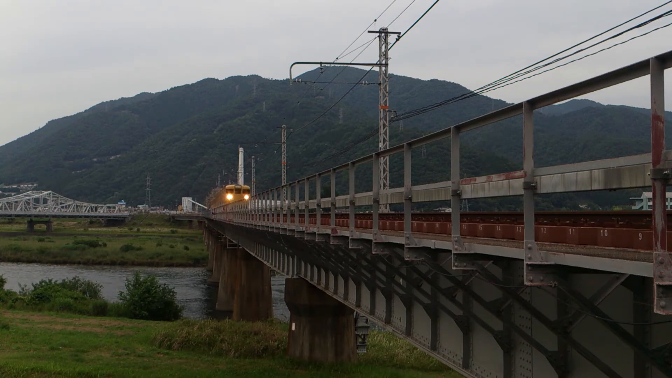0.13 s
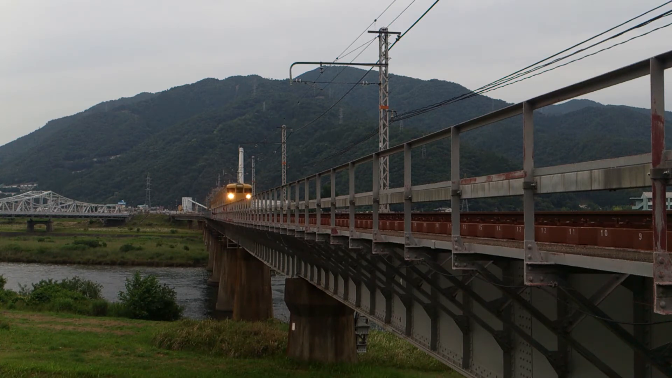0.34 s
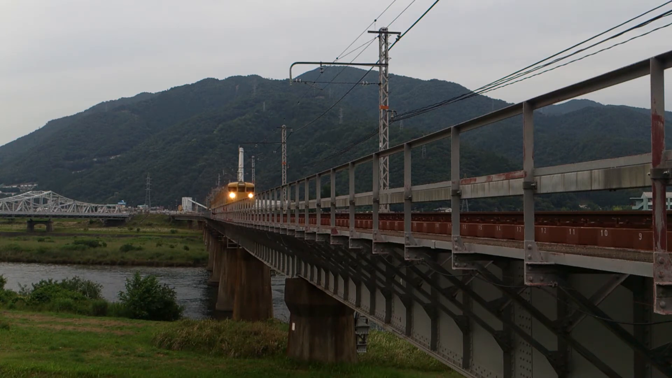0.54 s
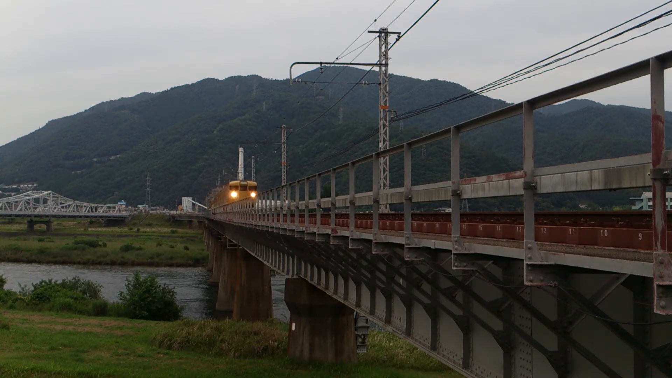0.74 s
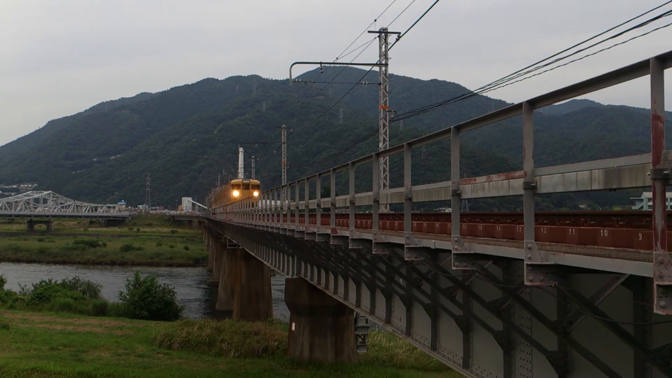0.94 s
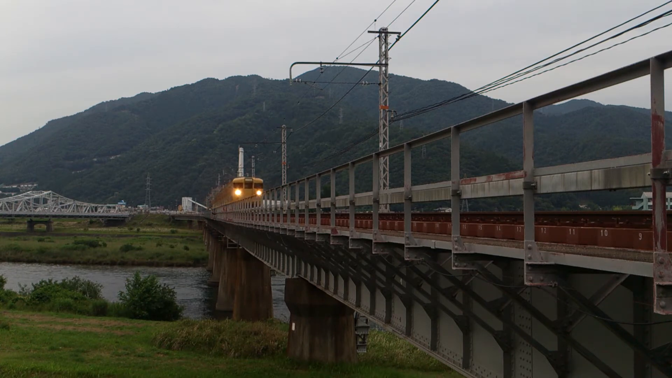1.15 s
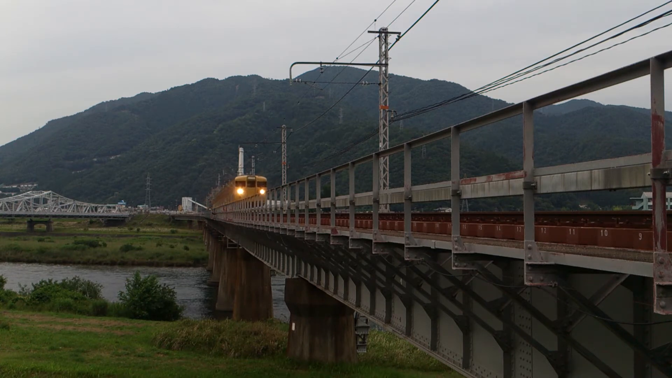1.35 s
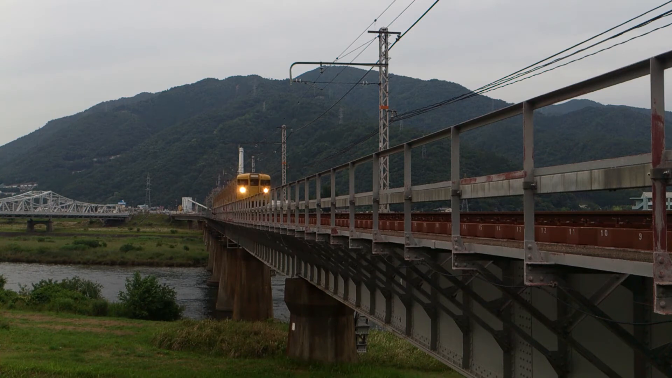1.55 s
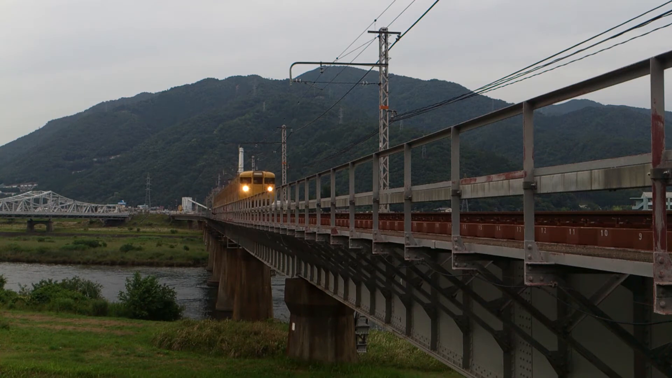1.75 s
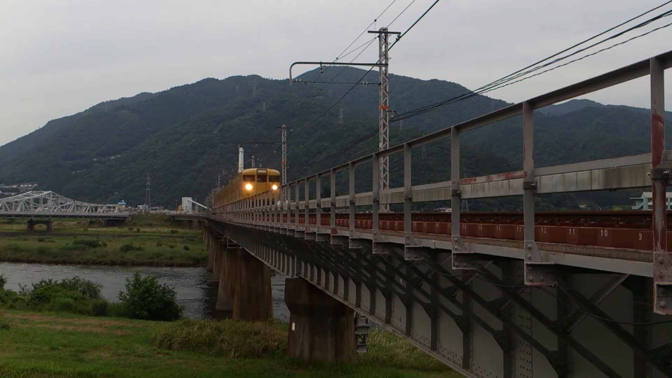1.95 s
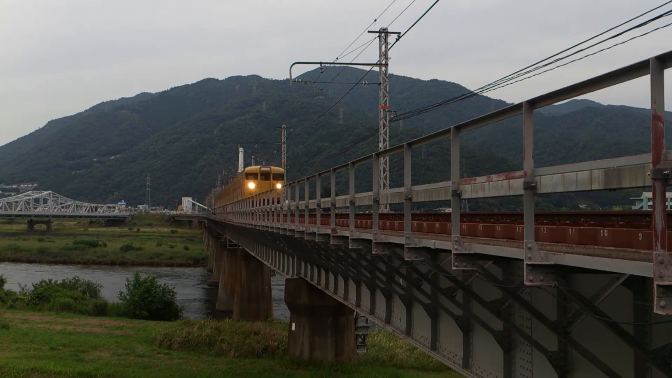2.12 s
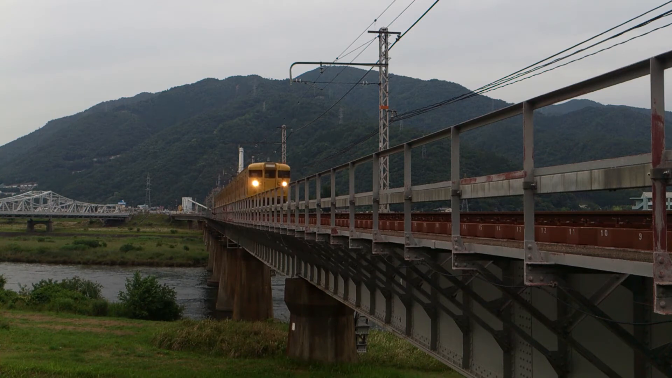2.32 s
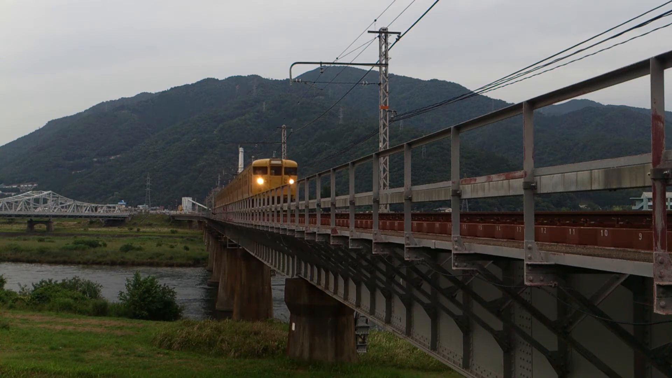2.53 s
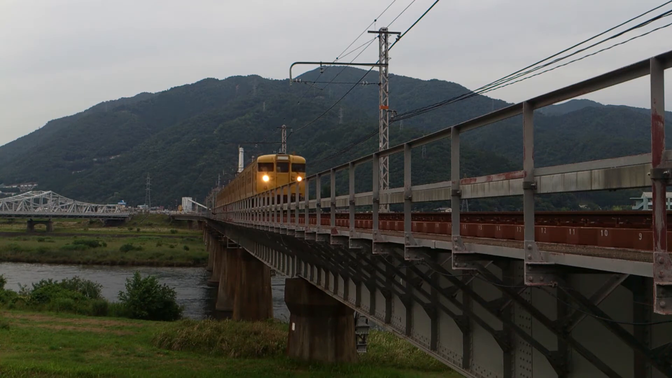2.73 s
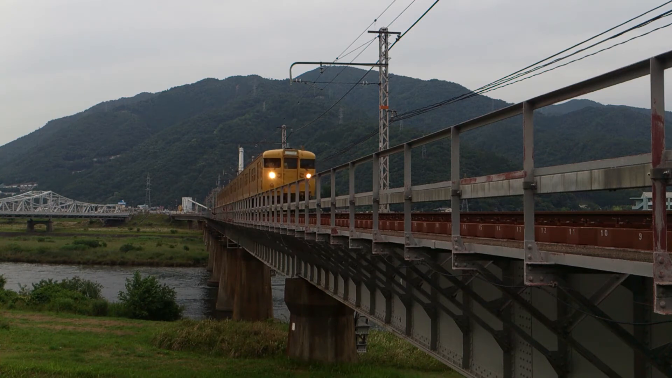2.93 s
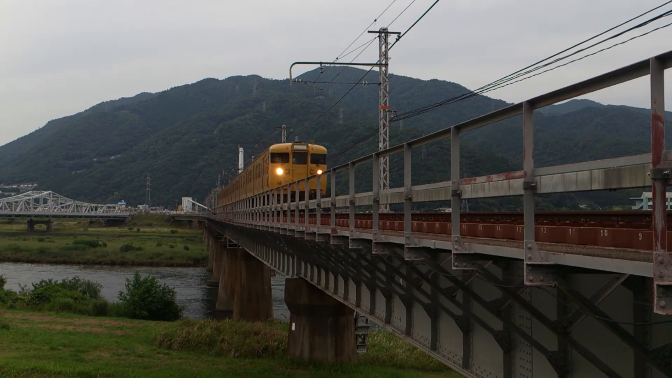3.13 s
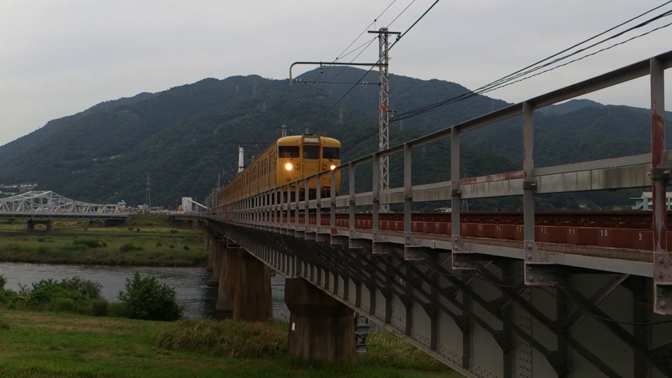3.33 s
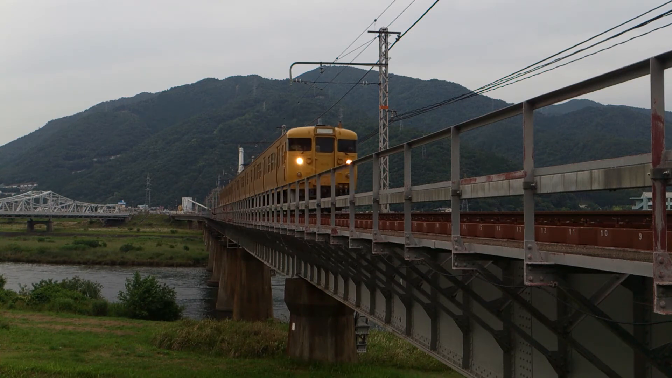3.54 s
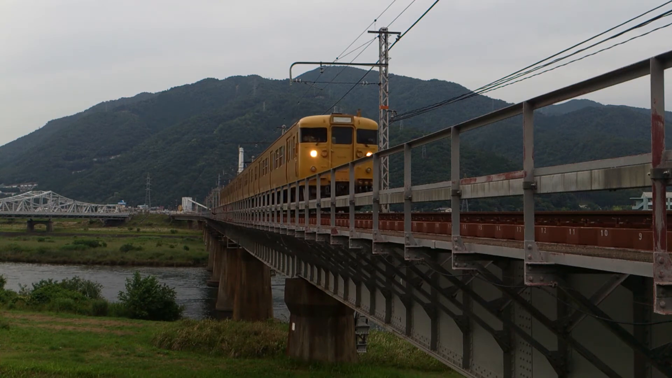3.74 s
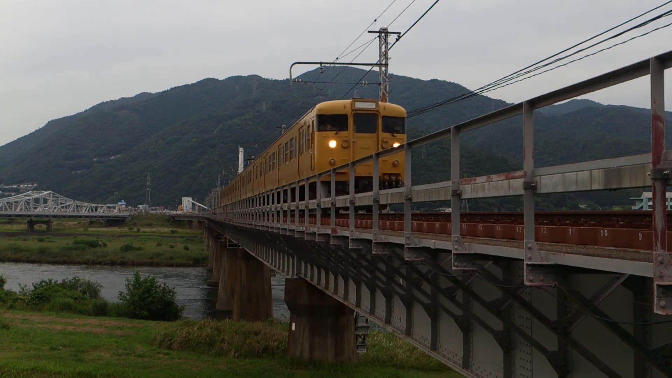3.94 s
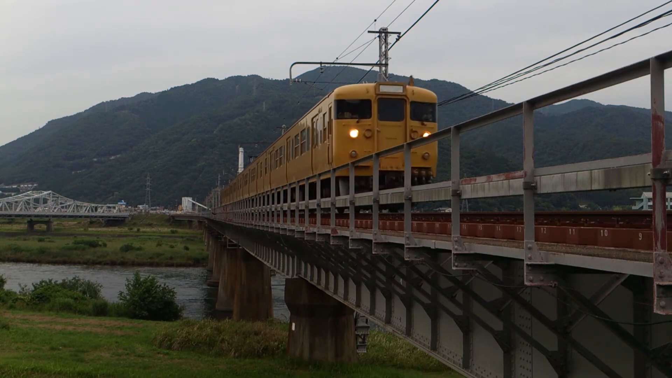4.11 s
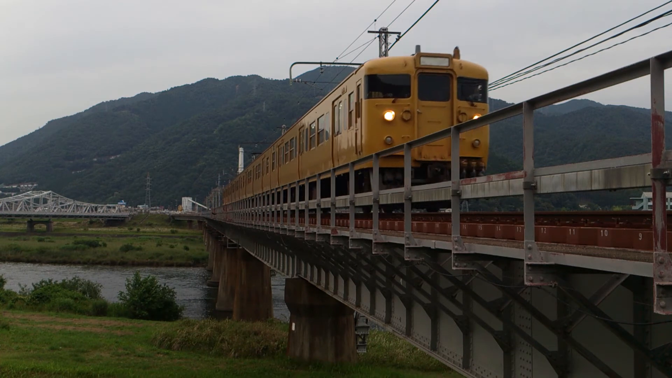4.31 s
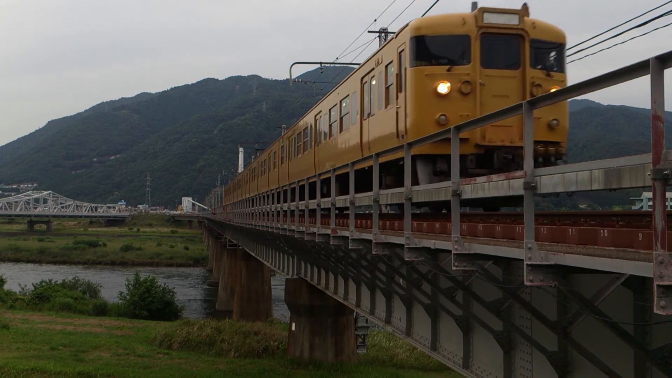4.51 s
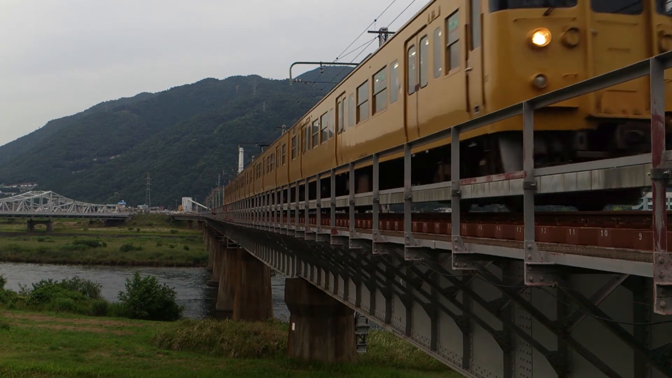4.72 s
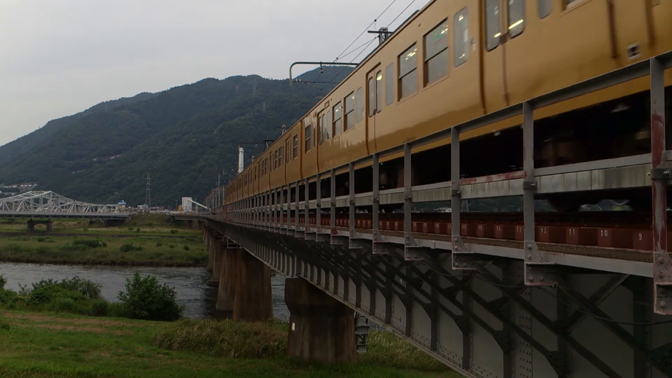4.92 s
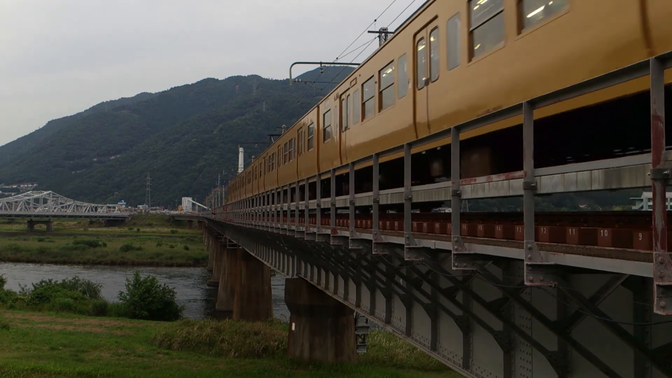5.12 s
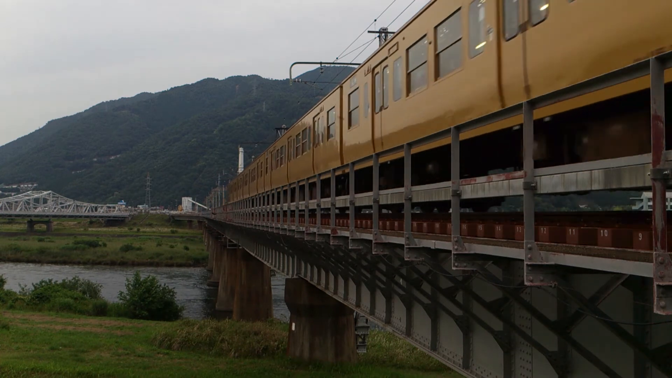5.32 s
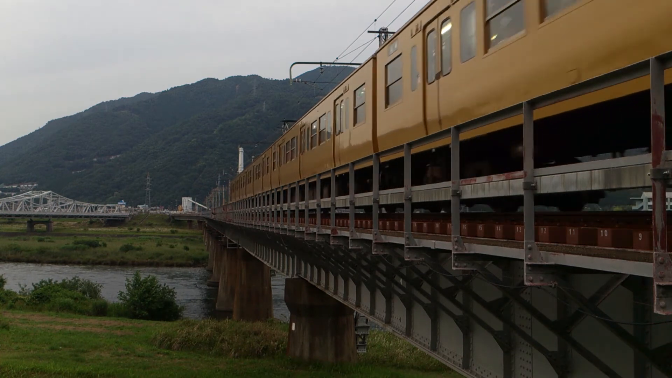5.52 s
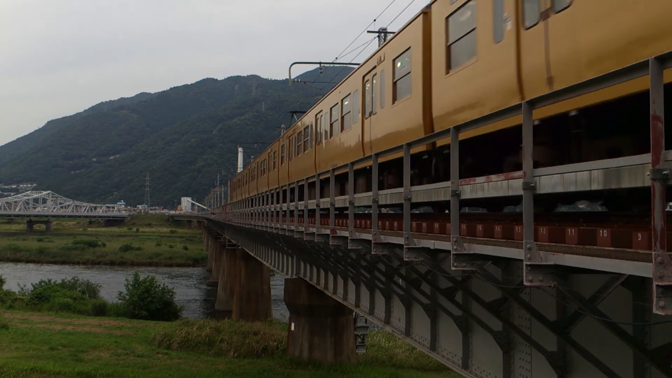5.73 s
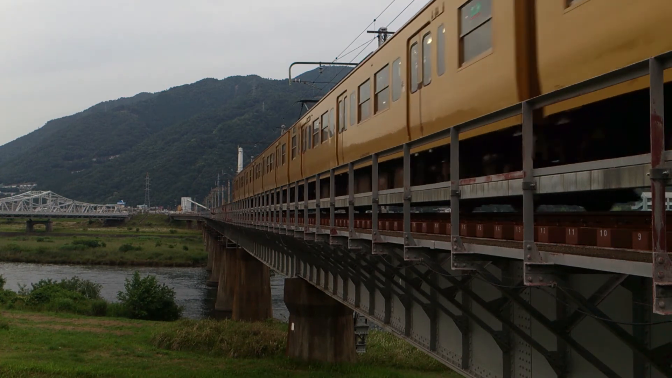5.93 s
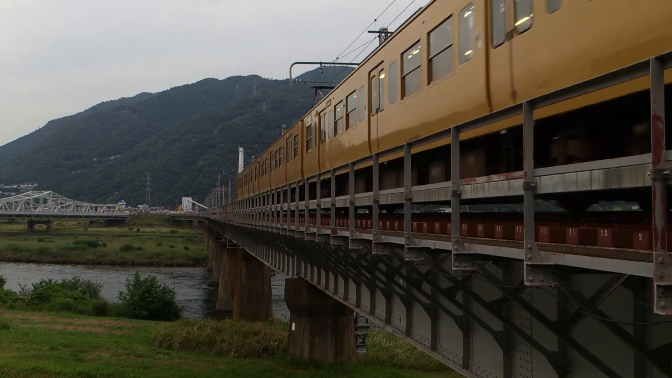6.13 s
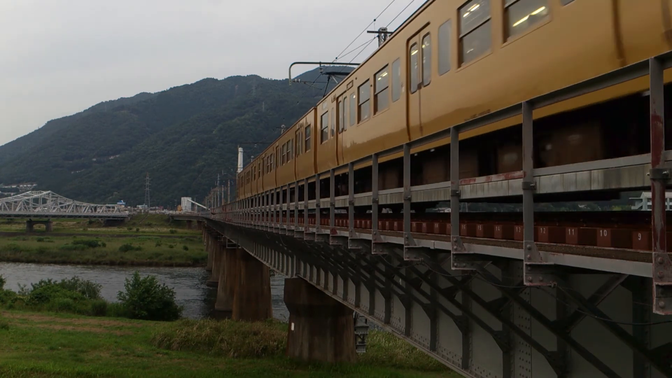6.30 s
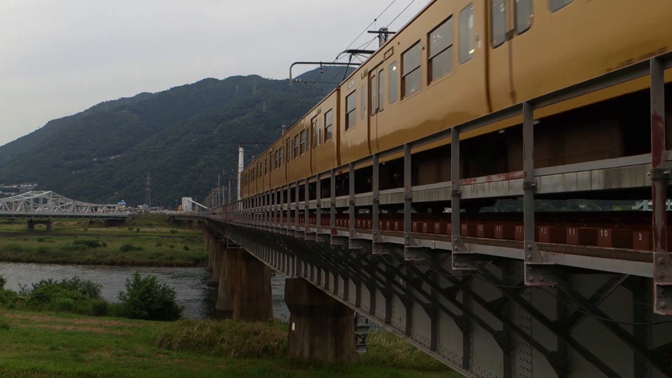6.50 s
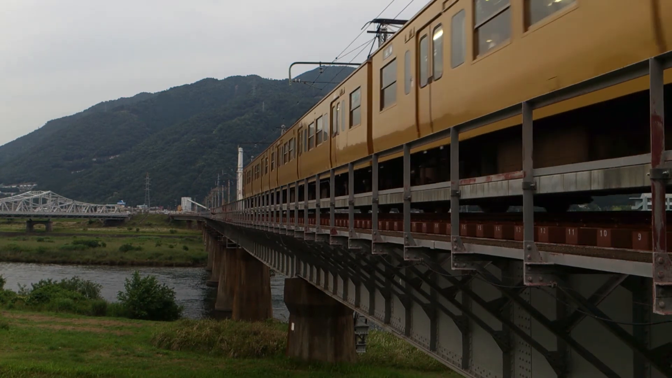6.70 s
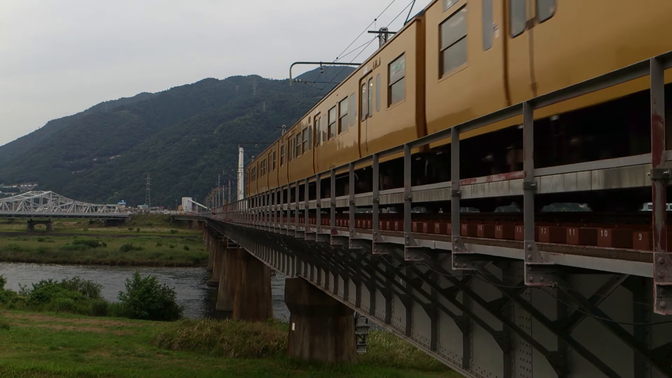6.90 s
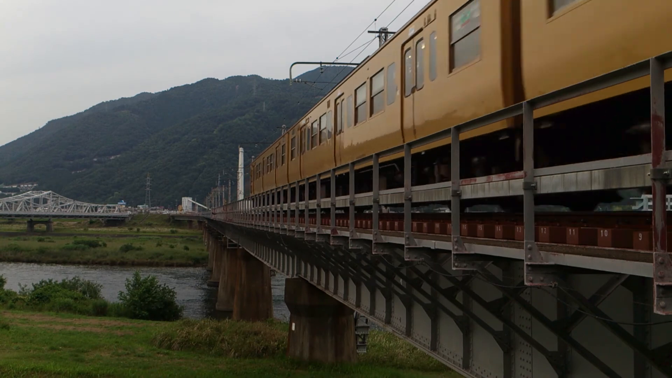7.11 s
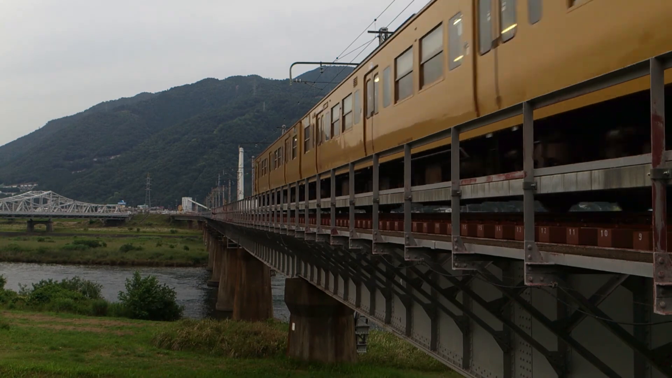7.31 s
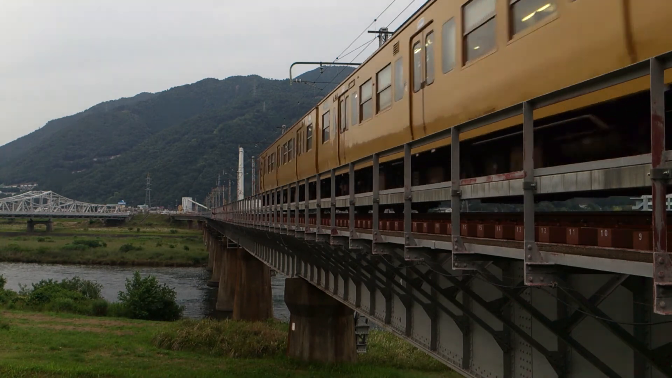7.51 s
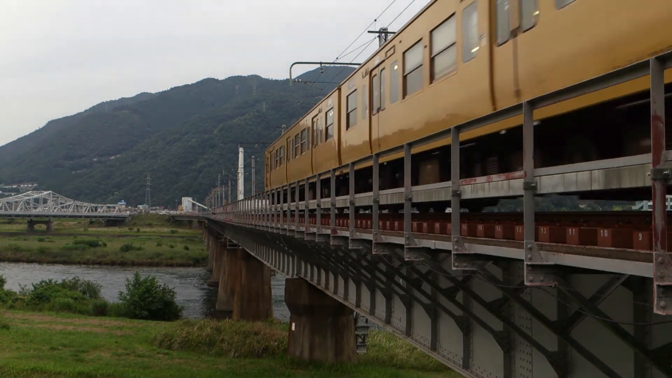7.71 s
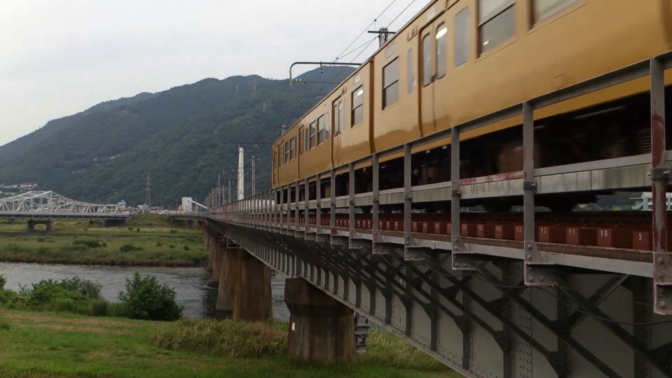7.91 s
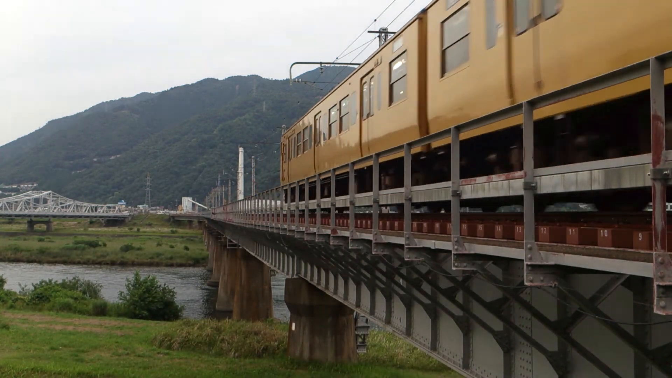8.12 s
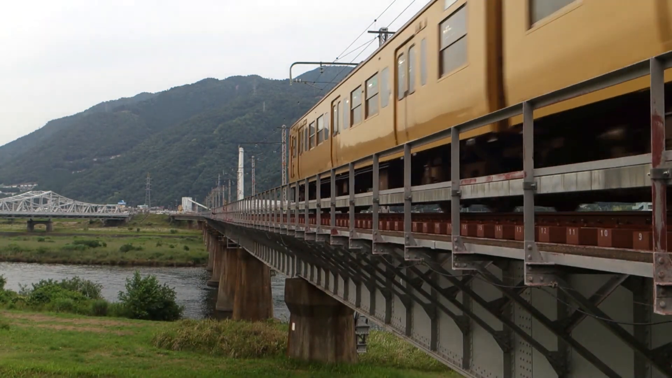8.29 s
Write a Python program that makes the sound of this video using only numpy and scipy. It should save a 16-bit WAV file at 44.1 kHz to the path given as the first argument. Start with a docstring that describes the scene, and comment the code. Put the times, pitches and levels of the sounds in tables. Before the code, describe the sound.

A camera shutter snaps five times as an electric train nears over a droning steel bridge, then roars past with rhythmic wheel clatter.

```python
"""A camera shutter snaps over the drone of a steel girder bridge and a faint river hiss.
An electric train rolls over the bridge and passes close by; the shutter fires five times as it nears.
Rough wheels ring the girders, treads roar and hiss on the rail, gears growl and flanges squeal.
Axle pairs strike three rail joints: one far out, one on the span (which booms), one close by."""
import sys
import numpy as np
from scipy import signal
from scipy.fft import rfft, irfft
from scipy.io import wavfile
from scipy.ndimage import uniform_filter1d

SR = 44100
rng = np.random.default_rng(int(sys.argv[2]) if len(sys.argv) > 2 else 0)


def output_pcm(signal):
    """Save a mono or channel-first signal as 16-bit PCM at the path in sys.argv[1].

    Samples are clipped to [-1, 1] before scaling.
    """
    pcm = np.clip(np.atleast_2d(signal).T, -1, 1) * 32767
    wavfile.write(sys.argv[1], SR, np.round(pcm).astype(np.int16))


N = 368235
TIME_S = np.arange(N) / SR

CARS, CAR_GAP_S, BOGIE_GAP_S, AXLE_GAP_S = 4, 1.203, 0.843, 0.123
SPEED_M_S, ARRIVAL_S = 16.9, 5.052  # leading wheels draw level with the listener

# Noise spectra. Each row: frequency in Hz, relative density in dB.
RIVER_SPECTRUM = [(1290, -35), (2200, -13), (2450, -4.5), (2710, -7.5), (3650, -9.5), (4380, -8.5),
                  (5220, -13), (5570, -15), (5910, -14), (6860, -9), (7840, -4), (8730, -12), (9640, -20),
                  (16000, -23.5)]
SHUTTER_SPECTRUM = [(1200, -23), (3000, -14), (4800, -11), (6200, -9), (7300, 0), (8400, 3), (9600, -15.5),
                    (12500, -18), (16000, -21)]
DECK_SPECTRUM = [(20, -33), (32, -26), (47, -5), (56, -11), (70, 1), (82, -3), (98, 1.5), (112, -2),
                 (135, -4.5), (170, -43)]
ROAR_SPECTRUM = [(420, -33), (720, -3), (950, -3), (1300, -3.5), (1650, -7), (2100, -8), (2500, -11.5),
                 (3100, -20), (4000, -27)]
HISS_SPECTRUM = [(1650, 3), (2800, -6.5), (3060, -8), (4150, 1), (5480, -8.5), (5980, 0), (6480, -4.5),
                 (7280, 1.5), (7830, 1.5), (9330, -11), (10500, -13), (12000, -20), (13200, -20),
                 (15100, -21), (16000, -28)]
CLANK_SPECTRUM = [(120, -42), (250, 7), (450, 15.5), (800, 7), (1200, 3.5), (2000, -6), (3000, -10),
                  (4200, -12), (6000, -18), (7800, -9.5), (10000, -34), (16000, -38)]
TICK_SPECTRUM = [(4000, -15), (7600, 9), (9000, 1), (11500, -5.5), (13200, -14), (16000, -7)]
CLASH_SPECTRUM = [(1500, 7.5), (2800, 0.5), (3400, -1.5), (4900, 3), (6200, -3.5), (7700, 6), (9200, -4.5),
                  (12000, -23), (16000, -30)]

# Resonances. Each row: frequency in Hz, width in Hz, relative level in dB.
MOTOR_MODES = [(122.2, 10, -0.5), (241, 6.7, 4)]
GEAR_WHEEL_MODES = [(543, 86, 1.5), (588.5, 52, -0.5), (635.6, 13.7, -2), (662.7, 35.3, .5),
                    (707, 48, -7.5), (756, 110, -8.5)]
WHEEL_RAIL_MODES = [(3286, 61, -1), (3596, 170, 2.5), (4080, 110, -1), (4580, 91, -7), (4970, 82, -3.5),
                    (5390, 100, -2), (7480, 150, -4), (7900, 250, 2), (10040, 120, -10), (12190, 110, -21),
                    (12990, 120, -18)]
RAIL_END_MODES = [(4490, 98, 1), (7950, 300, -7), (10300, 300, -3.5), (10840, 370, -1), (12950, 450, -4),
                  (13550, 700, -1)]
# Girder plates. Each row: frequency in Hz, width in Hz, weight in dB with the train far, then near.
GIRDER_MODES = [(124.6, 13.4, -6.5, -0.5), (158.2, 20.4, 3.5, 2), (182, 31, 2, 1), (204.1, 17.6, 3.5, -1.5),
                (247.3, 15.4, -1, 1.5), (284.7, 17.2, 4.5, -4), (295, 24.5, -7.5, -0.5),
                (328, 29, -1.5, -1), (350.8, 19, -10, -4), (367.5, 15.4, -7, -1), (402.5, 27.4, -6, -3),
                (442, 26, -15, -3), (474.5, 44, -12.5, -8.5)]
# Span under an axle. Each row: frequency in Hz, relative level in dB, decay in seconds.
BOOM_MODES = [(93, 0.5, 0.095), (86, -7, 0.042), (102.5, -7.5, 0.062), (71.1, -9, 0.16)]

# Insects on the bank. Each row: centre in seconds, pitch in Hz, level in dB.
INSECT_CHIRPS = [(2.18, 5800, -54), (2.472, 9000, -52), (2.565, 8350, -50), (2.665, 8300, -48)]
# Shutter cycles. Each row: mirror up, first curtain, second curtain, mirror down in seconds, gain in dB.
SHUTTER_CYCLES = [(.1015, .1162, .166, .2066, 0), (.348, .3625, .4152, .456, -1),
                  (.5972, .6115, .6645, .7052, 0), (.9954, 1.0098, 1.0571, 1.098, -1),
                  (3.997, 4.0125, 4.0611, 4.102, 0)]
# Flange contacts. Each row: centre in seconds, pitch in Hz, level in dB, half length in seconds.
FLANGE_SQUEALS = [(4.105, 1770, -25.5, 0.02), (4.094, 4620, -38, .012), (5.608, 8230, -27, 0.022),
                  (5.62, 4940, -35, 0.03), (5.77, 4900, -37, .03), (6.572, 4870, -35, 0.044),
                  (7.707, 8300, -25, 0.021), (7.76, 7840, -27, 0.037), (8.06, 7480, -23, .045)]
# Swells. Each row: centre in seconds, gain in dB, half length in seconds.
GIRDER_SWELLS = [(0.05, 4, 0.15), (0.62, 2.5, .12), (1.197, 3, 0.3), (2.287, 3.5, 0.15), (2.82, 4, 0.23),
                 (3.617, 2.5, 0.23), (4.172, 4, .24)]  # bogies roll onto the farther spans
GEAR_HOWLS = [(4.7, -17.5, 0.2), (5.55, -23, 0.11), (5.95, -17.5, .24), (7.16, -19.5, 0.21),
              (8.35, -19.5, 0.16)]
TREAD_SCRAPES = [(4.14, -30, 0.064), (4.25, -29, 0.049), (4.35, -29, .07), (5.19, -27, 0.036),
                 (5.3, -31, 0.022), (6.2, -29.5, 0.043)]
# Axles on a rail joint. Each row: start in seconds, base level in dB.
FAR_STRIKES = [(2.705, -29.5), (2.84, -30.5), (3.545, -33), (3.68, -31.5), (3.885, -33)]
NEAR_STRIKES = [(5.586, -23), (5.711, -18.5), (6.428, -18.5), (6.548, -21.5), (6.785, -16.5), (6.911, -16),
                (7.628, -18), (7.754, -18), (7.986, -14), (8.113, -15)]


def undb(db):
    return 10 ** (np.asarray(db) / 20)


def unit_rms(x):
    return x / np.sqrt(np.mean(x ** 2))


def noise():
    return rng.standard_normal(N)


def colour(x, spectrum):
    """Filter by a spectrum, falling 48 dB per octave beyond its ends; white noise keeps its power."""
    hz, db = np.transpose(spectrum)
    octave, knots = np.log2(np.fft.rfftfreq(len(x), 1 / SR) + 1), np.log2(hz)
    beyond = np.abs(octave - np.clip(octave, knots[0], knots[-1]))
    gain = unit_rms(undb(np.interp(octave, knots, db) - 48 * beyond))
    return irfft(rfft(x) * gain, len(x))


def wander(rate_hz):
    """Random steps, smoothed twice; unit RMS."""
    hold = int(SR / rate_hz)
    steps = np.repeat(noise()[:N // hold + 1], hold)
    return unit_rms(uniform_filter1d(uniform_filter1d(steps, hold), hold)[:N])


def grains(per_s, spread_db):
    """Dense tiny impacts of uneven size."""
    impacts = (rng.random(N) < per_s / SR) * noise()
    return unit_rms(impacts * undb(spread_db * np.minimum(rng.exponential(size=N), 4)))


def resonance(hz, width_hz, drive=None):
    """Two peak filters in series, driven by fresh noise by default."""
    drive = noise() if drive is None else drive
    b, a = signal.iirpeak(hz, hz / (1.55 * width_hz), SR)
    return unit_rms(signal.lfilter(b, a, signal.lfilter(b, a, drive)))


def ring(modes):
    """Resonances sharing one noise drive."""
    drive = noise()
    return unit_rms(sum(undb(db) * resonance(hz, width_hz, drive) for hz, width_hz, db in modes))


def strike_shape(t, rise_s, decay_s):
    """Smooth rise, exponential decay; peak 1."""
    shape = (1 - np.exp(-(t / rise_s) ** 2)) * np.exp(-t / decay_s)
    return shape / shape.max()


def blows(starts_s, levels_db, rise_s, decay_s):
    """Envelope of a run of blows, summed in power."""
    shape = strike_shape(np.arange(SR) / SR, rise_s, decay_s)
    power = np.zeros(N + SR)
    for start_s, db in zip(starts_s, levels_db):
        i = int(start_s * SR)
        power[i:i + SR] += (undb(db) * shape) ** 2
    return np.sqrt(power[:N])


def bell(centre_s, half_s):
    return np.exp(-((TIME_S - centre_s) / half_s) ** 2)


def swells(table):
    return sum(undb(db) * bell(centre_s, half_s) for centre_s, db, half_s in table)


def approach(reach_m, loss_db_per_m=0):
    """Distance gain, 1 from arrival on; spreading takes 3 dB at reach_m."""
    gap_m = SPEED_M_S * np.maximum(ARRIVAL_S - TIME_S, 0)
    return undb(-loss_db_per_m * gap_m) / np.hypot(1, gap_m / reach_m)


def axle_times(first_s):
    """Crossings of one spot: two axles to a bogie, two bogies to a car."""
    times_s = np.array([first_s + car * CAR_GAP_S + bogie_s + axle_s for car in range(CARS)
                        for bogie_s in (0, BOGIE_GAP_S) for axle_s in (0, AXLE_GAP_S)])
    return times_s[times_s < TIME_S[-1]]


def riverbank():
    """Far water hisses; insects chirp thinly."""
    chirps = sum(undb(db) * bell(centre_s, half_s=0.007) * resonance(hz, width_hz=350)
                 for centre_s, hz, db in INSECT_CHIRPS)
    return colour(noise(), RIVER_SPECTRUM) * undb(-52 + wander(5.3)) + chirps


def shutter():
    """Mirror and curtains snap; the first curtain bounces, the mirror pings twice, its spring settles."""
    up_s, first_s, second_s, down_s, db = np.transpose(SHUTTER_CYCLES)
    snaps = [(up_s, -31), (first_s - 0.003, -30), (first_s, -23.5), (first_s + 0.0113, -33),
             (second_s, -25.5), (down_s, -32)]
    strike = sum(blows(at_s, db + snap_db, rise_s=0.00048, decay_s=0.0016) for at_s, snap_db in snaps)
    body = blows(first_s, db - 39, rise_s=0.0012, decay_s=0.015)
    body += blows(second_s, db - 44, rise_s=0.0013, decay_s=0.016)
    spring = blows(down_s, db - 40.5, rise_s=0.001, decay_s=0.038)
    ping = blows(down_s, db - 27, rise_s=0.00051, decay_s=0.0014)
    ping += blows(down_s + 0.0062, db - 34, rise_s=0.001, decay_s=0.0026)
    return colour(noise() * (strike + body + spring), SHUTTER_SPECTRUM) + resonance(8500, 770) * ping


def chinks(per_s=9, low_hz=3590, high_hz=6260, decay_s=0.024):
    """Loose steel under the passing cars rings at random."""
    out, t = np.zeros(N + SR), np.arange(SR // 8) / SR
    passing_s = TIME_S[-1] - ARRIVAL_S
    for when, pitch, size in rng.random((int(per_s * passing_s), 3)):
        i = int((ARRIVAL_S + when * passing_s) * SR)
        hz = low_hz + pitch * (high_hz - low_hz)
        out[i:i + len(t)] += undb(-38.5 + 10 * size) * np.exp(-t / decay_s) * np.sin(2 * np.pi * hz * t)
    return out[:N]


def flanges():
    """Flanges brush the rail in short, narrow squeals."""
    return sum(undb(db) * bell(centre_s, half_s) * resonance(hz, width_hz=200)
               for centre_s, hz, db, half_s in FLANGE_SQUEALS)


def running_gear(rail_borne_db=-46.5):
    """Gears growl, carried far ahead by the rails, and howl at each car end; the motor cars hum."""
    airborne = undb(-23) * approach(reach_m=13.8, loss_db_per_m=0.14)
    growl = ring(GEAR_WHEEL_MODES) * np.hypot(airborne, undb(rail_borne_db))
    howl = unit_rms(ring(GEAR_WHEEL_MODES) + undb(-6) * resonance(668, 60)) * swells(GEAR_HOWLS)
    hum = ring(MOTOR_MODES) * undb(-24.3) * bell(centre_s=7.24, half_s=1.3)
    return growl + howl + hum


def wheels(rail_borne_db=-47, hiss_rise_db_per_s=0.92):
    """Treads roar, hiss and scrape on the rail, shuddering together; the hiss carries least far."""
    shudder, scrape = wander(28), swells(TREAD_SCRAPES)
    # The rail flexes between sleepers and sings ahead of the train.
    singing = resonance(1210, 310) * undb(np.interp(TIME_S, [3.5, 5], [-9, -11]))
    roar = colour(grains(per_s=9000, spread_db=-0.1), ROAR_SPECTRUM) + singing
    roar_gain = np.hypot(undb(-25) * approach(reach_m=7.4, loss_db_per_m=0.14), undb(rail_borne_db))
    roar *= np.hypot(roar_gain, undb(4) * scrape) * undb(0.6 * shudder)
    hiss = colour(grains(per_s=14000, spread_db=-1), HISS_SPECTRUM)
    hiss += undb(-9 + 3.3 * wander(9)) * ring(WHEEL_RAIL_MODES)
    hiss_gain = undb(-28.5 + hiss_rise_db_per_s * (TIME_S - ARRIVAL_S))
    hiss_gain *= approach(reach_m=4.8, loss_db_per_m=0.22)
    hiss *= np.hypot(hiss_gain, scrape) * undb(1.2 * shudder + 0.92 * wander(60))
    return roar + hiss


def bridge():
    """Wheel roughness shakes the deck and rings the girder plates; other modes lead as the train nears."""
    nearness = np.interp(TIME_S, [2.2, 4.7], [0, 1])
    gains = [undb(far_db + nearness * (near_db - far_db)) for _, _, far_db, near_db in GIRDER_MODES]
    plates = sum(gain * resonance(hz, width_hz) for gain, (hz, width_hz, _, _) in zip(gains, GIRDER_MODES))
    plates /= np.sqrt(sum(gain ** 2 for gain in gains))
    swell_db = sum(db * bell(centre_s, half_s) for centre_s, db, half_s in GIRDER_SWELLS)
    drone = plates * undb(-14 + swell_db) * approach(reach_m=11.67)
    deck = colour(noise(), DECK_SPECTRUM) * undb(-20 + 0.4 * swell_db) * approach(reach_m=9.5)
    return drone + deck


def far_joint():
    """Dull clanks, smeared by the bridge's length; rail and wheels ring on, the deck thuds."""
    starts_s, db = np.transpose(FAR_STRIKES)
    clank = colour(noise(), CLANK_SPECTRUM) + undb(-7) * resonance(1190, 330)
    clank += undb(-14.5) * resonance(2050, 660)
    clank *= blows(starts_s, db + 0.5, rise_s=0.004, decay_s=0.07)
    tail = undb(-9) * ring(GEAR_WHEEL_MODES) + undb(-4) * colour(noise(), DECK_SPECTRUM)
    tail += undb(-15.5) * resonance(2100, 900)
    tail *= blows(starts_s, db, rise_s=0.015, decay_s=0.2)
    return clank + tail


def span_boom(starts_s, levels_db, delay_s=0.0276, rise_s=0.016):
    """Axle weight drops on the span; its low modes boom a moment later."""
    out, t = np.zeros(N + SR), np.arange(SR // 2) / SR
    for start_s, db in zip(starts_s, levels_db):
        i = int((start_s + delay_s) * SR)
        for hz, mode_db, decay_s in BOOM_MODES:
            detune, phase = rng.standard_normal(2)
            wave = np.sin(2 * np.pi * (hz * (1 + 0.017 * detune) * t + phase))
            out[i:i + len(t)] += undb(db + mode_db) * strike_shape(t, rise_s, decay_s) * wave
    return out[:N]


def span_joint():
    """Each axle rings the rail end and its wheels, clanks the fittings and sets the span booming."""
    starts_s = axle_times(first_s=4.087)
    first_bogie_db = 3.5 * (starts_s < starts_s[2])  # the first bogie's two strikes sound louder
    tick = undb(-3) * colour(grains(per_s=7000, spread_db=2.5), TICK_SPECTRUM)
    tick += undb(-4) * ring(RAIL_END_MODES)
    tick *= blows(starts_s, -28.6 + 0.2 * first_bogie_db, rise_s=0.009, decay_s=0.016)
    clank = colour(noise(), CLANK_SPECTRUM)
    clank *= blows(starts_s + 0.012, np.full(len(starts_s), -19.8), rise_s=0.014, decay_s=0.039)
    boom = span_boom(starts_s, -11.7 + first_bogie_db)
    wheel_ring = ring(GEAR_WHEEL_MODES)
    wheel_ring *= blows(starts_s, -31.5 + first_bogie_db, rise_s=0.012, decay_s=0.24)
    return tick + clank + wheel_ring + boom


def near_joint():
    """Wheels clash brightly on the rail; the steel rings and a sizzle lingers."""
    starts_s, db = np.transpose(NEAR_STRIKES)
    clash = colour(grains(per_s=6000, spread_db=1), CLASH_SPECTRUM)
    clash *= blows(starts_s, db - 0.7, rise_s=0.0035, decay_s=0.024)
    steel = ring(WHEEL_RAIL_MODES) + resonance(5000, 250)
    steel *= blows(starts_s, db - 11.5, rise_s=0.0035, decay_s=0.015)
    clank = colour(noise(), CLANK_SPECTRUM) * blows(starts_s, db - 0.6, rise_s=0.0022, decay_s=0.018)
    sizzle = undb(1) * colour(noise(), TICK_SPECTRUM) + undb(-16) * ring(RAIL_END_MODES)
    sizzle *= blows(starts_s, db - 13, rise_s=0.006, decay_s=0.14)
    return clash + steel + clank + sizzle


def scene():
    """Mono mix of rolling train, joint strikes, shutter and riverbank."""
    rolling = bridge() + running_gear() + wheels() + flanges() + chinks()
    joints = far_joint() + span_joint() + near_joint()
    return (rolling + joints + shutter() + riverbank())[None]


def record(dry):
    """Limiter, soft clip, steep low-pass."""
    window_s, limit_db, cutoff_hz = 0.022, -9, 15800
    rms = np.sqrt(np.abs(uniform_filter1d(dry[0] ** 2, int(window_s * SR))))
    limited = dry / (1 + (rms / undb(limit_db)) ** 6) ** (1 / 6)
    rounded = 1.603 * np.tanh(limited * undb(0.4) / 1.587)
    return signal.sosfilt(signal.ellip(10, 0.2, 70, cutoff_hz, fs=SR, output="sos"), rounded)


dry = scene()
out = record(dry)
output_pcm(out)
```